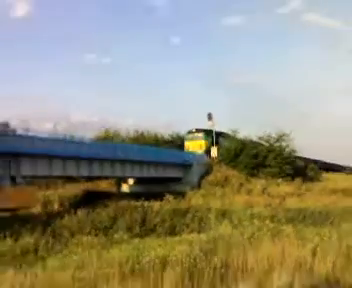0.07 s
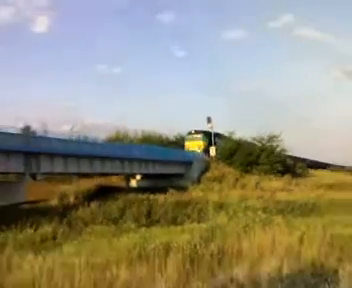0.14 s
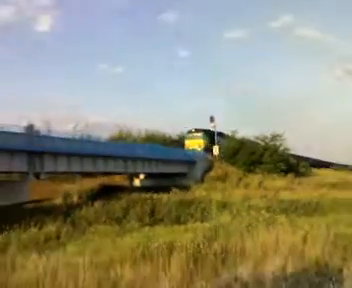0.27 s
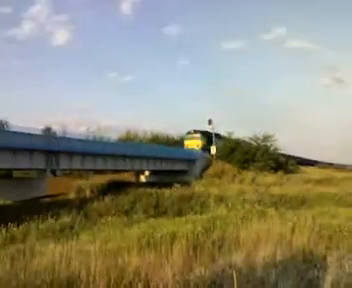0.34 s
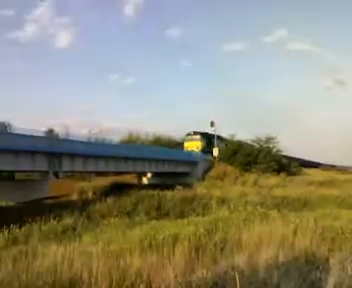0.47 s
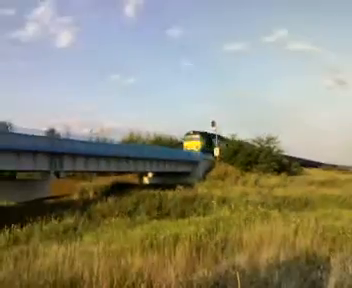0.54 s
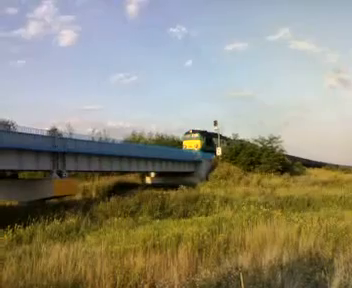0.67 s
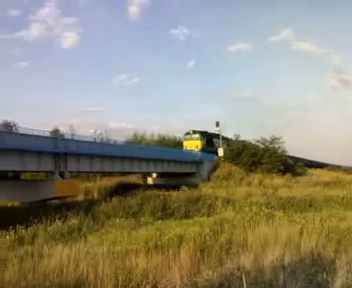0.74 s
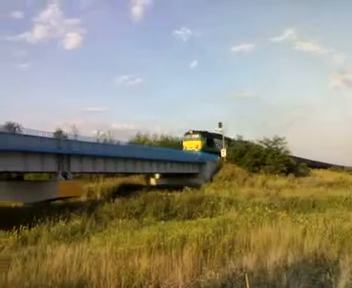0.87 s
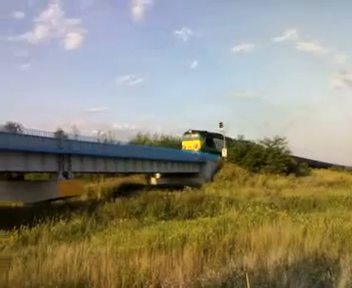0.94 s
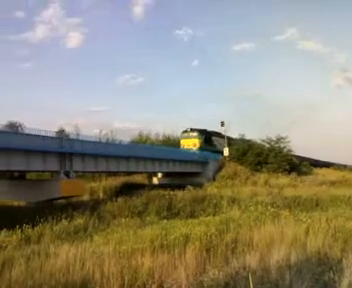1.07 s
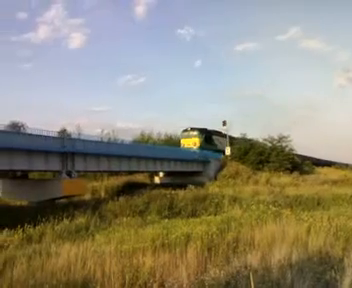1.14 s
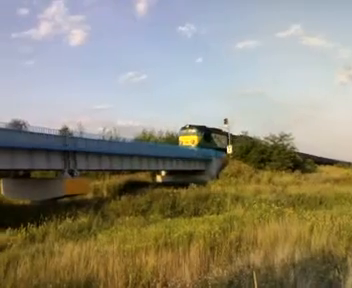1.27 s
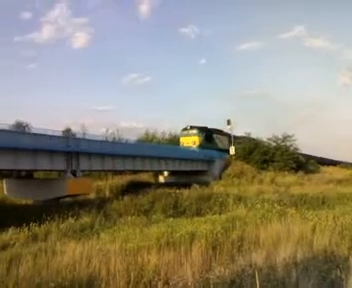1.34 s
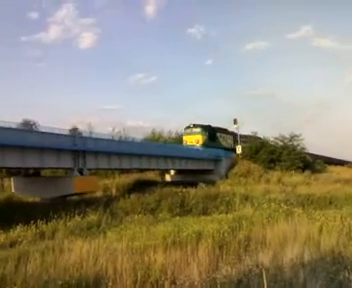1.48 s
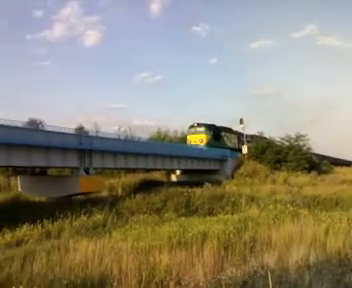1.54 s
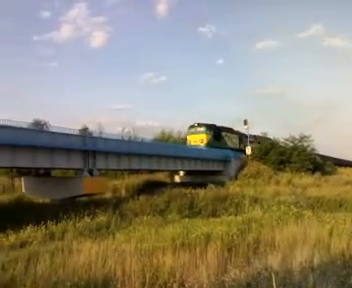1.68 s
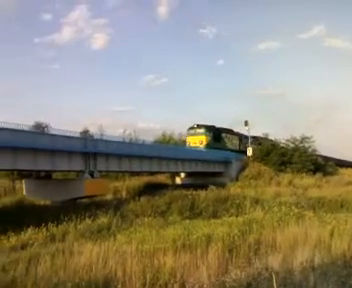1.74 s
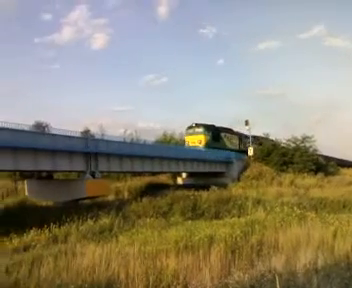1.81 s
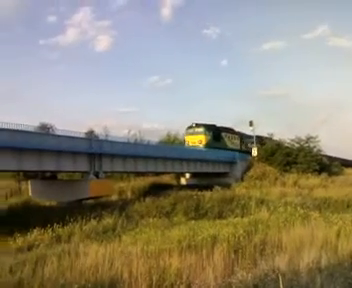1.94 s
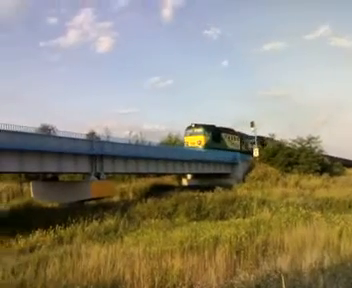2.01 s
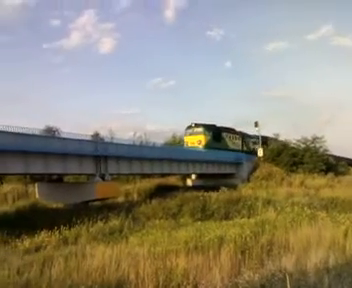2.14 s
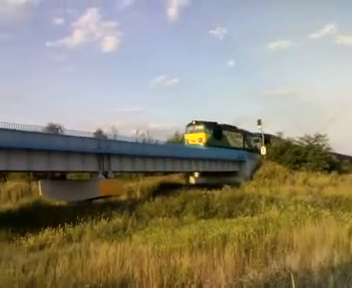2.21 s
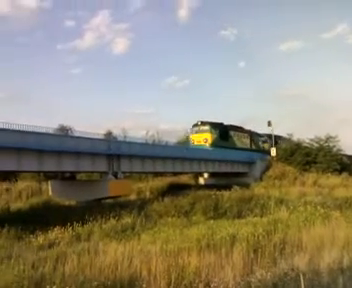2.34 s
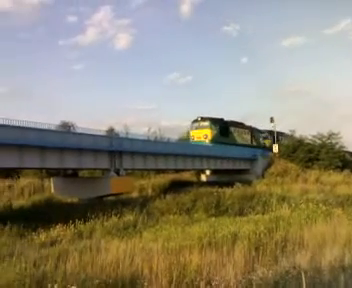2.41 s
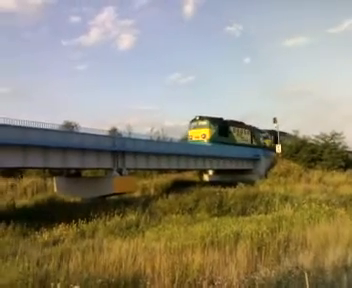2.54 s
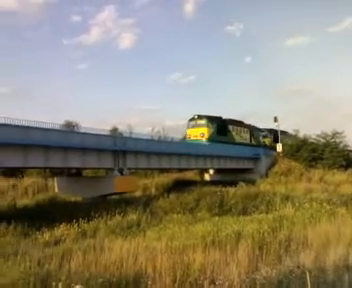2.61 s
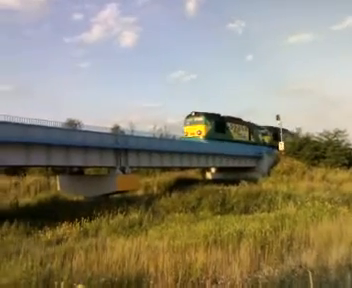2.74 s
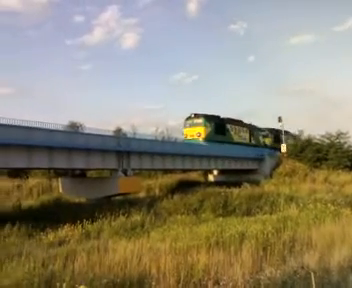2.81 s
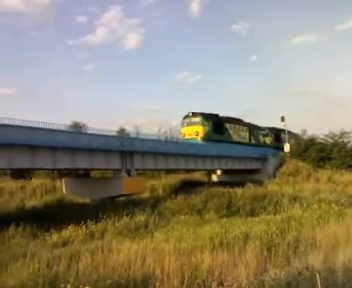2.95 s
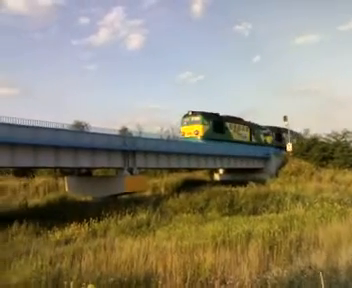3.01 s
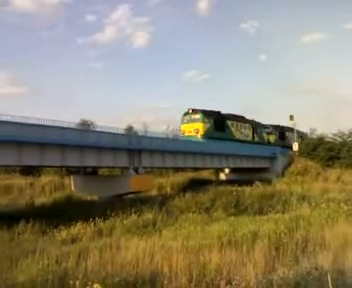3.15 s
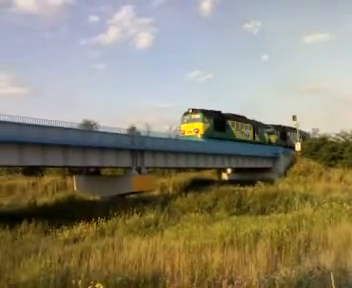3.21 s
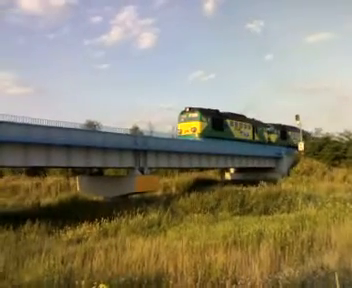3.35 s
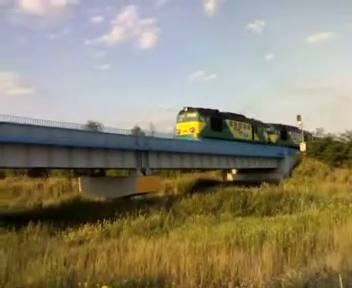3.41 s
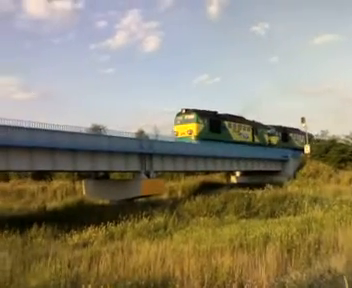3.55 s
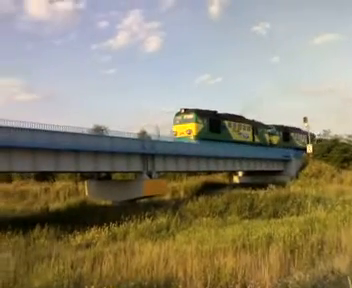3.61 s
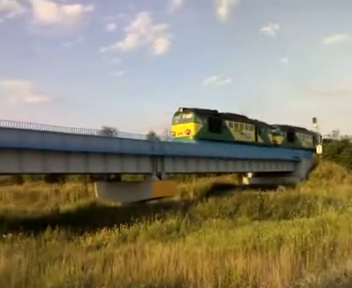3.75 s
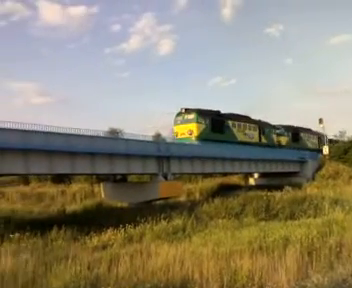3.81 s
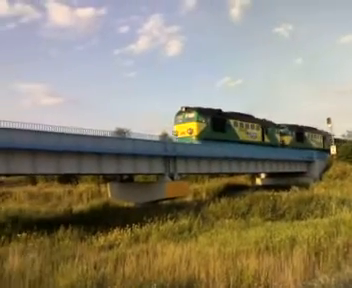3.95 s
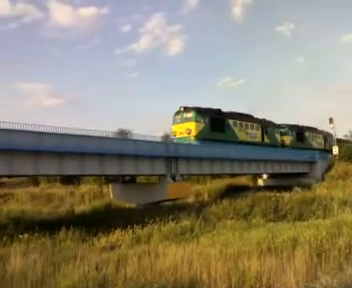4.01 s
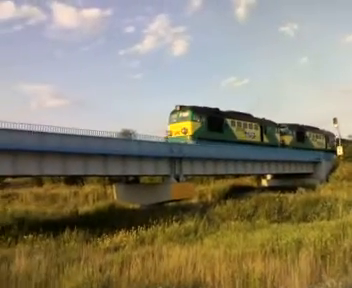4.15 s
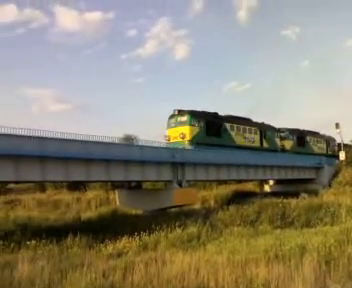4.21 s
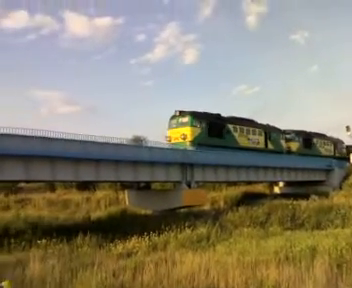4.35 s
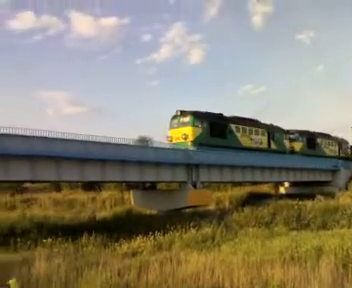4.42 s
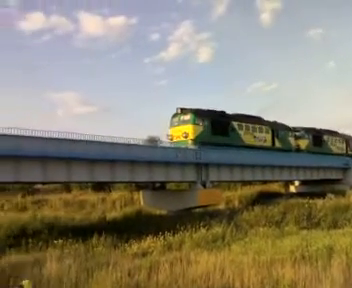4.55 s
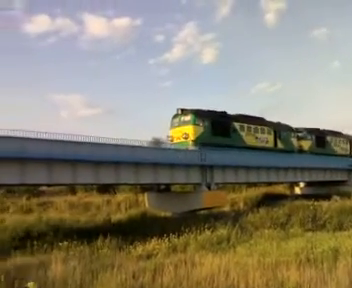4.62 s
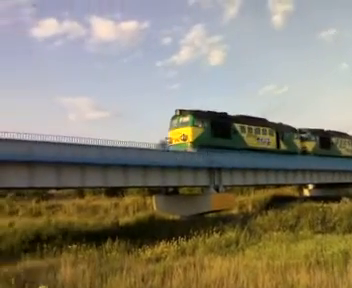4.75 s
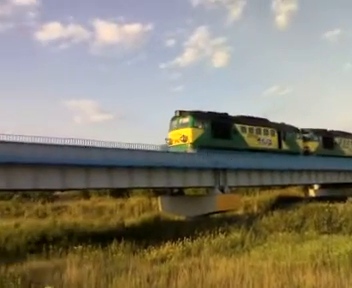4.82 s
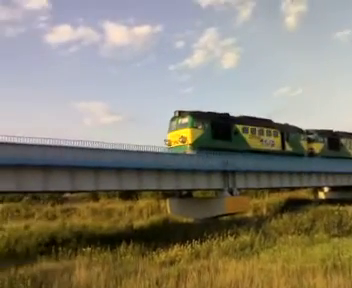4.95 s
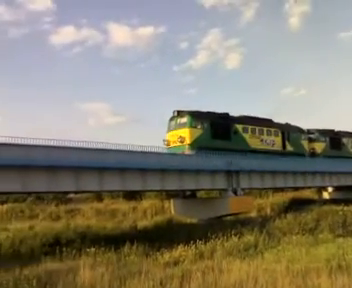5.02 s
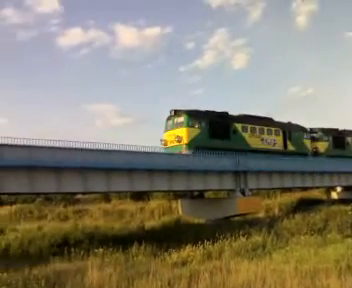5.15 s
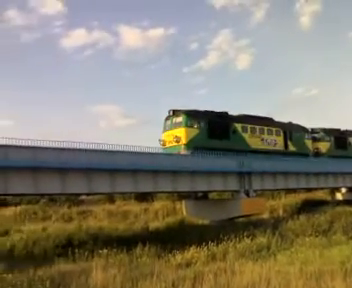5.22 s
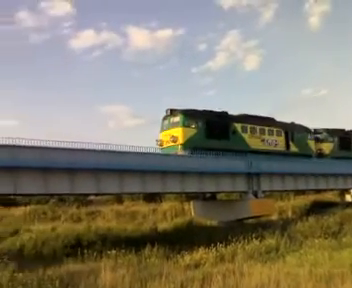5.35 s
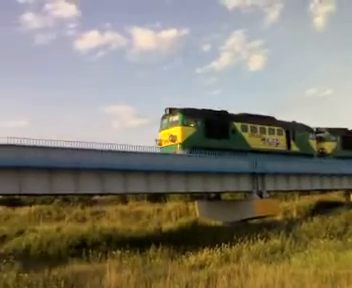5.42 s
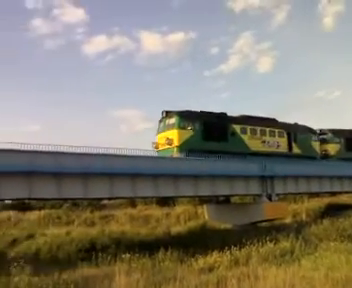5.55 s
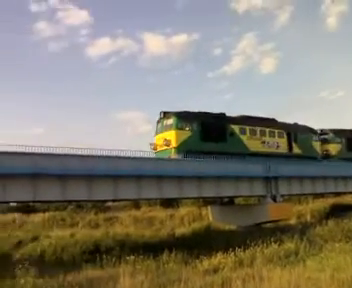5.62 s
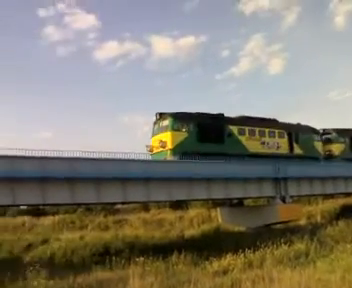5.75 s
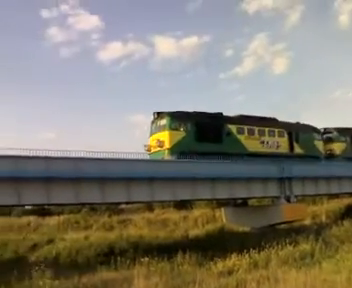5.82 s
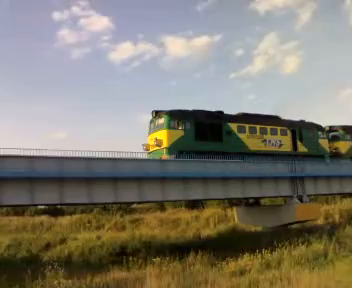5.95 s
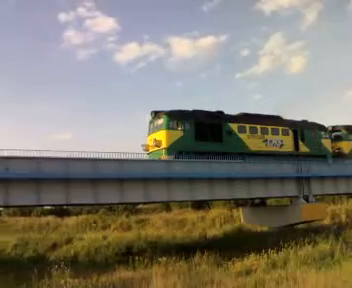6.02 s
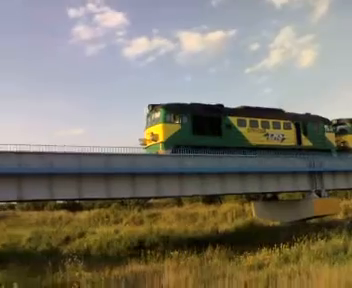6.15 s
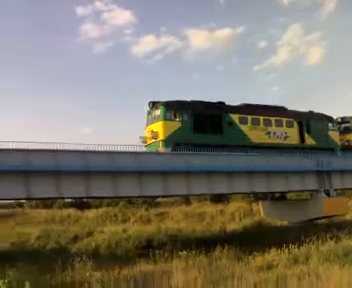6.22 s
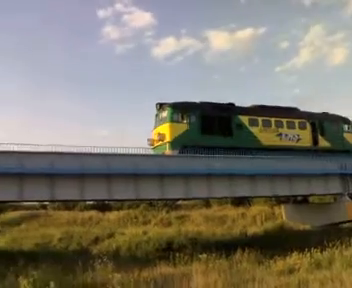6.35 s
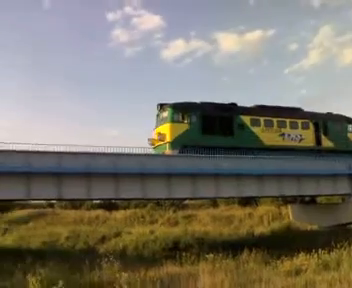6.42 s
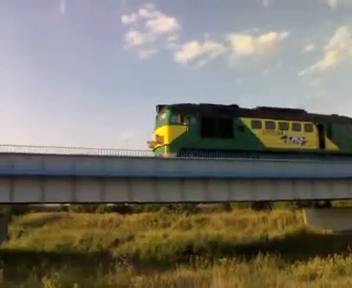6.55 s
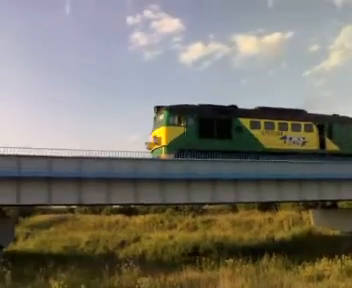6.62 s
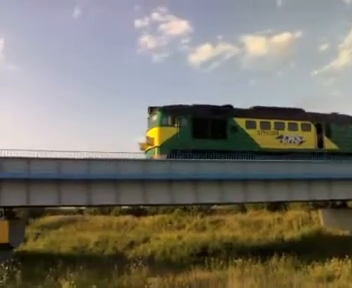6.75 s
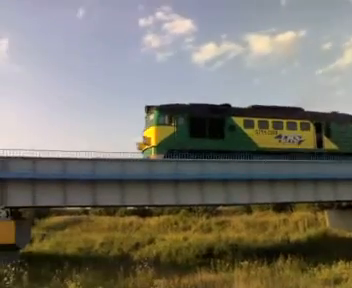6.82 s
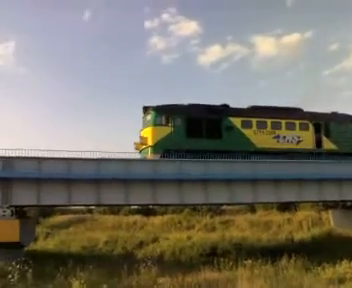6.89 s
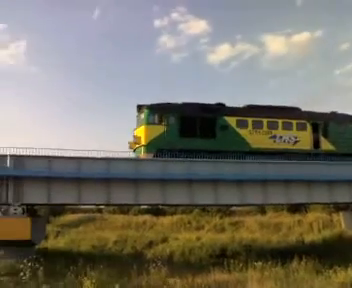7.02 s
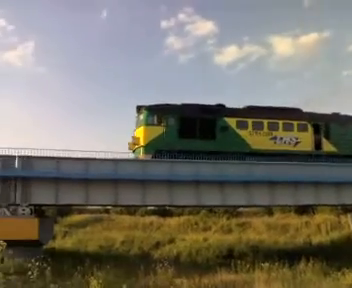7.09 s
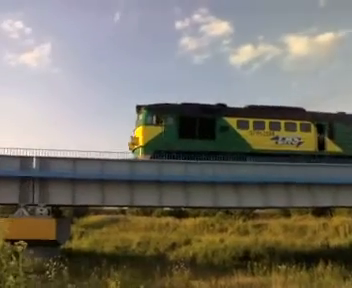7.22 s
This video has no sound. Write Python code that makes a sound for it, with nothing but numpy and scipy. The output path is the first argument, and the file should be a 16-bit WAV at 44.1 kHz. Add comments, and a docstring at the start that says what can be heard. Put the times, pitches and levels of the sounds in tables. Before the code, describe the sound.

Outdoors in a meadow below a steel bridge, two diesel locomotives approach steadily. At first there is a dull exhaust roar, whining blowers, and a deep drone that pulses about every 1.3 seconds. The bridge begins to boom under the load, then engine throb and wheel rolling noise grow fuller and clearer. Near the end a dry tick sounds close to the microphone, followed by a thin metallic flange scrape with short squeals.

```python
"""From a meadow below a steel bridge: two coupled diesel locomotives draw near with a freight train.
First blower whine, engine-room hums and a deep exhaust drone that cancels every 1.28 s, being two
near-equal engine speeds; then the bridge booms under the load and its girders, shaped noise, join in.
Out in the open, the firing note and the rolling noise of the wheels grow and the drone builds up.
Late on come a sharp falling tick close by and a flange scrape, noise with short squealing tones."""
import sys
import numpy as np
from scipy import signal
from scipy.fft import rfft, irfft
from scipy.io import wavfile
from scipy.ndimage import uniform_filter1d

SR = 44100
rng = np.random.default_rng(int(sys.argv[2]) if len(sys.argv) > 2 else 0)


def generate_wav(sig):
    """Save sig (samples, or channels by samples) to the path in sys.argv[1] as 16-bit PCM at SR."""
    pcm = np.round(np.clip(np.atleast_2d(sig).T, -1, 1) * 32767).astype(np.int16)
    wavfile.write(sys.argv[1], SR, pcm)


N = 320607
TIME = np.arange(N) / SR
BINS = np.fft.rfftfreq(N, 1 / SR)

CRANK_HZ = 14.37  # leading engine
# the drones of the two engines first cancel, and the time between cancellations (s)
FIRST_CANCEL_S, BEAT_S = .95, 1.28
# a steady pass on straight track; the locomotives are abreast of the microphone at ABREAST_S
SPEED_M_PER_S, TRACK_DISTANCE_M, ABREAST_S = 10.0, 25.0, 8.095
# out from behind the bank into the open: middle and time scale of the change (s)
IN_OPEN_S, OPENING_S = 3.85, 0.41
# whine overtone and gear tones emerge from behind the bank: middle and time scale (s)
EMERGE_S, EMERGING_S = 1.6, 0.45
# rolling noise when abreast (dB), and its fading with distance (1 = as 1 / distance)
ROLL_DB, ROLL_FALLOFF = -27, 1.082
# swells of the bridge boom under the moving load, shared by the throb: [t/s, half-width/s, gain/dB]
LOAD_SWELLS = [(1.5, .6, 1.5), (3.88, 0.6, 4), (4.85, 0.32, 1.5), (5.9, 0.22, 5.5), (6.98, 0.2, 3.5)]


def gain_of(db):
    """Decibels to amplitude."""
    return 10 ** (np.asarray(db) / 20)


def evened(x):
    """Scales to rms 1."""
    return x / np.sqrt(np.mean(x ** 2) + 1e-20)


def noise():
    """White noise of rms 1."""
    return rng.standard_normal(N)


def colour(x, spectrum):
    """Filters x by a spectrum that falls 48 dB per octave beyond its ends; rms 1."""
    hz, db = np.transpose(spectrum)
    knots = np.log2(hz)
    pitch = np.log2(BINS + 1)
    octaves_outside = np.maximum(knots[0] - pitch, 0) + np.maximum(pitch - knots[-1], 0)
    level_db = np.interp(pitch, knots, db) - 48 * octaves_outside
    return evened(irfft(rfft(x) * gain_of(level_db), N))


def low_pass(x, edge_hz):
    """Takes off the treble above edge_hz without delay."""
    taps = signal.firwin(601, edge_hz, window=("kaiser", 9), fs=SR)
    return signal.oaconvolve(x, taps, "same")


def drift(rate_hz):
    """Slow chance of rms 1, up to about rate_hz."""
    coarse = TIME[::100]
    hz = np.fft.rfftfreq(len(coarse), coarse[1])
    smoothing = np.exp(-(hz / rate_hz) ** 2) * (hz > 0)
    slow = irfft(rfft(rng.standard_normal(len(coarse))) * smoothing, len(coarse))
    return np.interp(TIME, coarse, evened(slow))


def step(middle_s, scale_s):
    """A smooth change from 0 to 1."""
    return 1 / (1 + np.exp((middle_s - TIME) / scale_s))


def bell(middle_s, half_s):
    """A smooth rise to 1 and fall back, down to 1/e at half_s from the middle."""
    return np.exp(-((TIME - middle_s) / half_s) ** 2)


def swelling(rows):
    """Gain of a table of swells, resting at 1 away from them."""
    return gain_of(sum(db * bell(s, half_s) for s, half_s, db in rows))


def ahead_m():
    """Track that the locomotives still have to cover until they are abreast."""
    return SPEED_M_PER_S * (ABREAST_S - TIME)


def distance_m():
    """From the microphone to the locomotives."""
    return np.hypot(ahead_m(), TRACK_DISTANCE_M)


def carried(abreast_db, falloff):
    """Gain of a source on the train, which grows as the distance shrinks."""
    return gain_of(abreast_db) * (TRACK_DISTANCE_M / distance_m()) ** falloff


def approaching(far, near):
    """Fades the distant sound into the close one at constant power."""
    nearness = step(IN_OPEN_S, OPENING_S)
    return np.sqrt(1 - nearness) * far + np.sqrt(nearness) * near


def tone(hz, waver_hz, scatter):
    """A wavering machine tone of rms 1, partly scattered on its way through the open air."""
    turns = np.cumsum(hz + waver_hz * drift(4.24)) / SR
    path = 1 + scatter * (drift(22) + 1j * drift(14))
    return evened((path * np.exp(2j * np.pi * turns)).real)


def cranks():
    """Turns of both crankshafts; the slower one loses a third of a turn in every beat."""
    leader = CRANK_HZ * TIME
    beats = (TIME - FIRST_CANCEL_S) / BEAT_S + .5
    return leader, leader - beats / 3


def engine_pair(orders, trailing_db, flutter):
    """The same exhaust orders from both engines, fluttering with uneven combustion; rms 1."""
    out = np.zeros(N)
    for order, db in orders:
        start = rng.random()
        lead, trail = (np.exp(2j * np.pi * (order * turns + start)) for turns in cranks())
        unsteady = 1 + flutter * (drift(3.2) + 1j * drift(5))
        pair = lead + gain_of(trailing_db) * trail
        out += gain_of(db) * (pair * unsteady).real
    return evened(out)


def hiss(flutter_db=2.0):
    """A thin, fluttering hiss above the rolling noise, strongest as the locomotives cross the span."""
    # relative spectrum: [f/Hz, level/dB per Hz]
    spectrum = [(3800, -12), (4350, 0), (4620, -3), (5100, 2), (5600, -3), (6800, -17)]
    # course of the level about which it flutters: [t/s, level/dB]
    course = [(0, -60), (1.9, -57), (2.4, -56.5), (3.25, -56), (3.65, -51), (4.62, -48), (4.77, -46.5),
              (4.95, -48), (5.5, -50.5), (6.1, -54.5), (7.3, -60.5)]
    level_db = np.interp(TIME, *np.transpose(course)) + flutter_db * drift(11.0)
    return gain_of(level_db) * colour(noise(), spectrum)


def whistle():
    """A thin high whistle, one wavering tone that comes and goes."""
    # its one row: (t/s, half-width/s, f/Hz, level/dB)
    row = (4.5, 0.4, 3457.5, -50)
    s, half_s, hz, db = row
    return gain_of(db) * bell(s, half_s) * tone(hz, waver_hz=6.4, scatter=0.59)


def warble(start_hz=1700, sink_hz_per_s=12, level_db=-48.5, middle_s=2.76, half_s=2.0):
    """A strongly wavering whine that sinks as the locomotives reach the bridge."""
    whine = tone(start_hz - sink_hz_per_s * TIME, waver_hz=19, scatter=0.36)
    return gain_of(level_db) * bell(middle_s, half_s) * whine


def engine_room_hums():
    """Hums of the engine rooms, wavering tones that each carry clearly for a while."""
    # [t/s, half-width/s, f/Hz, level/dB]
    rows = [(0.599, 1.3, 328, -45.5), (0.699, 1.5, 488.6, -45), (.8, 1.7, 641, -52),
            (0.808, 1.1, 700, -55.5), (1.996, 2.1, 763, -51.5), (2.298, 1.2, 247.4, -41),
            (3.201, 2.2, 211.8, -42), (3.202, 0.94, 114.6, -38.5), (2.595, 1.1, 811, -47),
            (3.204, 1.8, 319.2, -42.5), (3.603, 1.1, 481, -43.5), (4.0, .6, 522, -46),
            (3.899, 0.82, 698, -47), (4.7, .6, 186.3, -35)]
    return sum(gain_of(db) * bell(s, half_s) * tone(hz, waver_hz=1.1, scatter=0.25)
               for s, half_s, hz, db in rows)


def gears():
    """Faint gear tones of the drive, emerging from behind the bank."""
    # [f/Hz, level/dB relative to the rolling noise]
    rows = [(484, -16.5), (575, -20), (635, -14.5), (708, -14.5), (1981, -22.5), (2151, -26.5),
            (2550, -21.5)]
    tones = sum(gain_of(db) * tone(hz, waver_hz=2.68, scatter=0.65) for hz, db in rows)
    return step(EMERGE_S, EMERGING_S) * carried(ROLL_DB, ROLL_FALLOFF) * tones


def cooling_fan(level_db=-41.0, fan_hz=366):
    """A wavering fan tone that stands out once, on the way in."""
    # [t/s, half-width/s, gain/dB]
    swell = [(2.55, 1.7, 5.5)]
    return gain_of(level_db) * swelling(swell) * tone(fan_hz, waver_hz=0.92, scatter=0.49)


def blowers(abreast_hz=793, head_on_rise_hz=7.0, trail_hz=785.5, trail_far_db=-41.0, trail_near_db=-48.0):
    """Whine of both engines' blowers; the leading one sinks in pitch as it draws level."""
    # the leading whine: [t/s, half-width/s, gain/dB]
    lead_swells = [(.12, 0.15, 6), (2.4, 0.75, -5), (4.85, 0.35, 5.5), (7.17, 0.22, 12.5)]
    # its overtone, which swells on its own: [t/s, half-width/s, gain/dB]
    octave_swells = [(4.7, 0.36, 3), (5.4, 0.22, 1.5), (6.1, 0.27, -4), (6.55, 0.078, 5),
                     (6.88, 0.067, 4.5), (7.2, 0.14, -0.5)]
    hz = abreast_hz + head_on_rise_hz * ahead_m() / distance_m()
    lead = carried(-37, 1) * swelling(lead_swells) * tone(hz, waver_hz=1.35, scatter=0.59)
    octave = carried(-35, 2) * swelling(octave_swells) * tone(2 * hz, waver_hz=2.2, scatter=0.15)
    trail_db = trail_far_db + (trail_near_db - trail_far_db) * step(IN_OPEN_S, OPENING_S)
    trail = gain_of(trail_db) * tone(trail_hz, waver_hz=0.5, scatter=0.27)
    return lead + trail + step(EMERGE_S, EMERGING_S) * octave


def tick(push_db=-8, push_lead_s=.0007, push_half_s=.00022, ring_rise_s=.0004):
    """A dry tick close by: a low push, a few cycles that fall in pitch, and a short ring."""
    # its one row: (t/s, level/dB, length/s, starting f/Hz, final f/Hz)
    shape = (6.62262, -2.2, .00128, 3780, 1000)
    # its ring: [f/Hz, level/dB relative to the falling cycles, time/s to decay by 60 dB]
    modes = [(3950, -5.8, .0042), (4700, -8.5, .0042), (6650, -19, .006), (7400, -16, .0055)]
    s, level_db, length_s, start_hz, end_hz = shape
    push = gain_of(push_db) * bell(s - push_lead_s, push_half_s)
    age = np.maximum(TIME - s, 0)
    progress = np.minimum(age / length_s, 1)
    hz = start_hz + (end_hz - start_hz) * progress
    turns = np.cumsum((age > 0) * hz) / SR
    snap = np.sin(np.pi * progress) * np.sin(2 * np.pi * turns)
    ring = sum(gain_of(db - 60 * age / t60) * np.sin(2 * np.pi * mode_hz * age)
               for mode_hz, db, t60 in modes)
    return push + gain_of(level_db) * (snap + np.minimum(age / ring_rise_s, 1) * ring)


def flanges(rasp_db=-2.0, rub_half_s=0.093):
    """Flanges rub the rail: a rasp, and the wheels singing in it on one pitch after another."""
    # relative spectrum of the rasp: [f/Hz, level/dB per Hz]
    spectrum = [(900, -23), (2000, -4.5), (2700, -2.5), (3200, -2), (4000, -10), (5000, -19), (7000, -20.5),
                (7500, -30)]
    # the rubs: [t/s, level/dB before rasp_db]
    rubs = [(6.9, -29.5), (7.16, -26.5)]
    # brief squeals: [t/s, half-width/s, f/Hz, level/dB]
    squeals = [(6.835, .016, 2650, -35), (6.863, .02, 3020, -36), (6.882, 0.022, 3480, -38),
               (6.91, .022, 3010, -37), (6.928, 0.014, 2790, -38), (6.94, .028, 2570, -38),
               (7.013, .013, 2730, -35), (7.082, 0.018, 3190, -33), (7.123, .016, 2970, -32.5),
               (7.14, 0.034, 4145, -44), (7.145, 0.023, 3210, -34), (7.16, .014, 2965, -34),
               (7.185, 0.02, 2770, -34.5), (7.23, 0.035, 2555, -33)]
    singing = sum(gain_of(db) * bell(s, half_s) * tone(hz, waver_hz=6.24, scatter=0.12)
                  for s, half_s, hz, db in squeals)
    rubbing = sum(gain_of(db) * bell(s, rub_half_s) for s, db in rubs)
    return gain_of(rasp_db) * rubbing * colour(noise(), spectrum) + singing


def bridge(boom_db=-23, boom_falloff=1.19, girders_db=-33, unloaded_db=-16):
    """The track booms under the load; the girders join in once the train is on the span."""
    # relative spectrum of the boom: [f/Hz, level/dB per Hz]
    boom_spectrum = [(14, -25), (25, -17.5), (33, -10.5), (39, -10.5), (47, -8), (57, 1), (66, -1.5),
                     (78, -11), (90, -9.5), (110, -30)]
    # relative spectrum of the girders: [f/Hz, level/dB per Hz]
    girder_spectrum = [(80, -8), (90, -5.5), (99, -3), (114, -4), (128, -8), (140, -21)]
    boom = colour(noise(), boom_spectrum)
    steady = boom / np.sqrt(uniform_filter1d(boom ** 2, size=6000) + 1e-3)  # evens out chance swells
    load = step(2.35, .22)  # the weight rolls onto the steel span (s)
    girder_gain = gain_of(girders_db + unloaded_db * (1 - load))
    girders = girder_gain * colour(noise(), girder_spectrum)
    return carried(boom_db, boom_falloff) * swelling(LOAD_SWELLS) * steady + girders


def with_echo(direct, share):
    """Adds a grazing reflection that hollows the noise at even steps of pitch, shrinking on approach."""
    # [t/s, step f/Hz]; the reflection lags by 1 / step
    hollow_step = [(0, 552), (2.4, 543), (4.1, 535), (7.3, 520)]
    late = TIME - 1 / np.interp(TIME, *np.transpose(hollow_step))
    return direct + share * np.interp(late, TIME, direct)


def wheels(flicker_db=0.7, pulse_depth=0.011, dull_db=-1.0, clear_s=0.73, clearing_s=.35):
    """Rolling noise and engine hiss, at first dull; the reflection's lag grows, so the colour sinks."""
    # relative spectrum from afar: [f/Hz, level/dB per Hz]
    far_spectrum = [(600, -26.5), (900, -2.5), (1300, 2.5), (1480, -2), (1680, 1.5), (1900, -4), (2200, -2),
                    (2450, -4), (2620, -2), (2760, -3), (2900, -8.5), (3100, -7), (3350, -9), (3600, -14),
                    (4000, -16.5), (4190, -18), (4350, -14), (4620, -16), (5050, -13), (6000, -19.5),
                    (6500, -26.5), (7400, -32.5)]
    # relative spectrum close by: [f/Hz, level/dB per Hz]
    near_spectrum = [(600, -34.5), (900, -1.5), (1300, 4), (1450, -0.5), (1630, 4), (1830, -1.5), (2200, 0),
                     (2750, -1), (3200, -3), (3700, -10.5), (4400, -17), (5200, -15), (6500, -17.5),
                     (7400, -28)]
    far = colour(with_echo(noise(), .17), far_spectrum)
    near = colour(with_echo(noise(), .09), near_spectrum)
    body = low_pass(far, 2400)
    treble_gain = gain_of(dull_db * (1 - step(clear_s, clearing_s)))
    far = body + treble_gain * (far - body)
    pulse = 1 + pulse_depth * np.cos(2 * np.pi * cranks()[0])
    flicker = gain_of(flicker_db * drift(35))
    return carried(ROLL_DB, ROLL_FALLOFF) * flicker * pulse * approaching(far, near)


def exhaust(uneven=0.062, puff_share=0.22):
    """Each cylinder lets out a puff of gas; strong and weak cylinders make it throb at crank speed."""
    # relative spectrum from afar: [f/Hz, level/dB per Hz]
    far_spectrum = [(70, -9.5), (90, -3), (112, -3.5), (128, -4.5), (142, -6.5), (175, -3.5), (250, -2),
                    (290, -2), (340, -2.5), (390, 0), (485, -4), (510, -9.5), (700, -7.5), (815, -9.5),
                    (850, -11), (1100, -24.5)]
    # relative spectrum close by: [f/Hz, level/dB per Hz]
    near_spectrum = [(70, 0.5), (110, -2.5), (142, -2), (168, 2), (235, 2), (285, -2), (345, -2.5),
                     (385, -2), (470, -3), (520, -4.5), (640, -5.5), (750, -9), (900, -8), (1150, -21.5)]
    gas = np.zeros((2, N))
    for turns in cranks():
        strength = 1 + uneven * np.cos(2 * np.pi * turns)
        puff = 1 + puff_share * np.cos(2 * np.pi * 12 * turns)  # twelve firings a turn
        gas += strength * puff * rng.standard_normal((2, N))
    roar = approaching(colour(gas[0], far_spectrum), colour(gas[1], near_spectrum))
    return carried(-21.5, 0.94) * roar


def engines(drone_db=-27.5, build_db=6.5):
    """A deep beating drone, a throb just above it, and the firing note that comes out on approach."""
    # deep drone: [multiple of the crank speed, relative level/dB]
    drone_orders = [(1, -34), (1.5, -23.5), (2, -15), (3, 3)]
    # half and whole orders of the crank speed, which beat into a throb: [multiple, relative level/dB]
    throb_orders = [(3.5, 1), (4, -4.5), (4.5, 3.5), (5, -18), (5.5, -13), (6, -12), (8, -12), (9, -9.5)]
    # firing note of twelve cylinders: [multiple of the crank speed, relative level/dB]
    firing_orders = [(6, -9), (7.5, -5.5), (8, -5.5), (8.5, -11.5), (9, -5), (10.5, -13.5), (11, -0.5),
                     (11.25, -9.5), (11.5, -7.5), (12, 5), (12.5, -3.5), (12.94, -1), (13.5, 1), (14, -11),
                     (14.75, -3.5), (17, -6.5), (17.5, -6.5)]
    built = step(4.76, .5)  # the drone builds up after the locomotives come into the open (s)
    drone = engine_pair(drone_orders, trailing_db=1.0, flutter=0.066)
    throb = engine_pair(throb_orders, trailing_db=-15.0, flutter=0.091)
    firing = engine_pair(firing_orders, trailing_db=-11.0, flutter=0.1)
    out = gain_of(drone_db + build_db * built) * drone
    out += carried(-28.0, 0.67) * swelling(LOAD_SWELLS) * throb
    return out + carried(-26, 1.36) * firing


def scene():
    """Everything as heard from the meadow: the train in full and a sharp tick close by."""
    machinery = engine_room_hums() + gears() + cooling_fan() + blowers()
    train = hiss() + whistle() + warble() + machinery + flanges() + bridge()
    train += wheels() + exhaust() + engines()
    return (low_pass(train, 7470) + tick())[None]


def record(dry, overload=.72, edge_hz=8750):
    """Rounds off peaks that reach the overload level and takes off the treble above edge_hz."""
    rounded = dry[0] / (1 + (dry[0] / overload) ** 16) ** (1 / 16)
    return low_pass(rounded, edge_hz)[None]


dry = scene()
out = record(dry)
generate_wav(out)
```